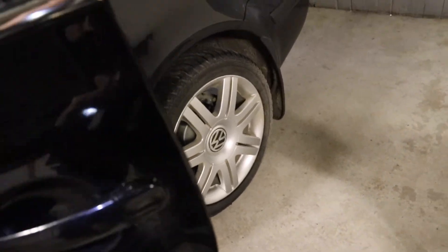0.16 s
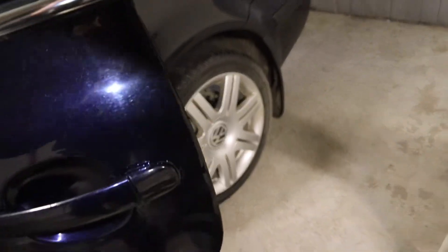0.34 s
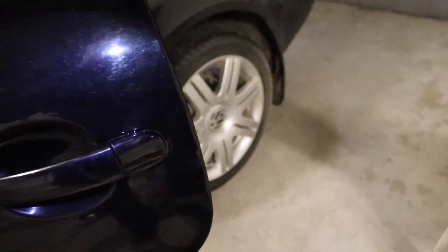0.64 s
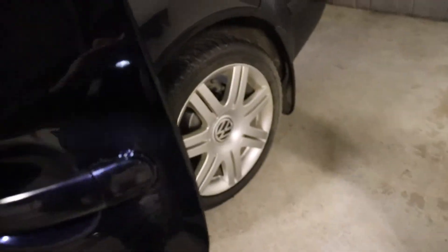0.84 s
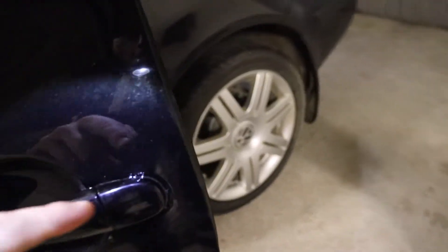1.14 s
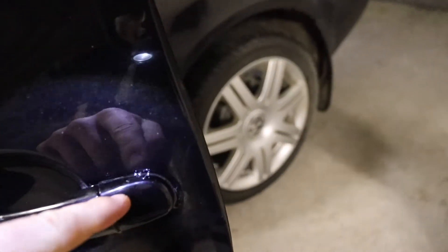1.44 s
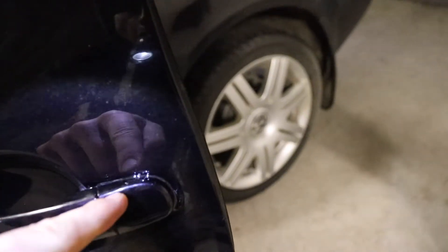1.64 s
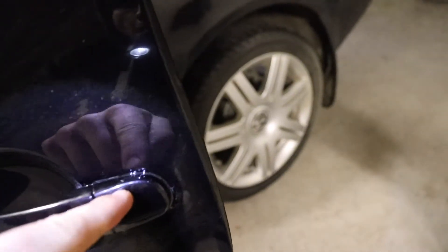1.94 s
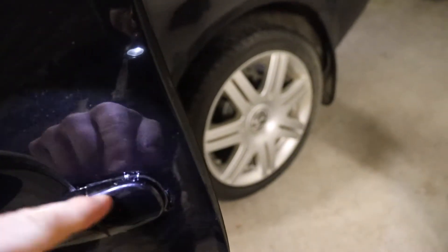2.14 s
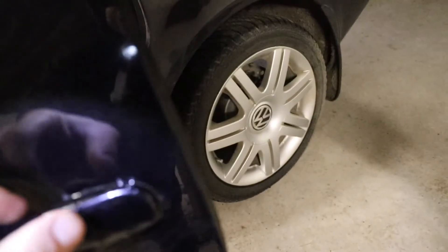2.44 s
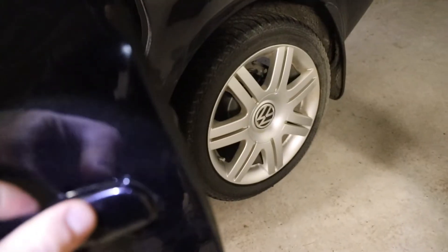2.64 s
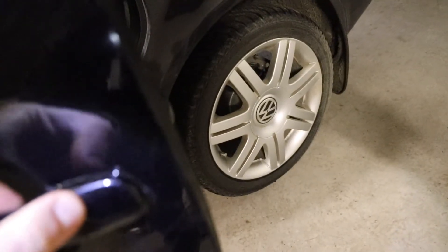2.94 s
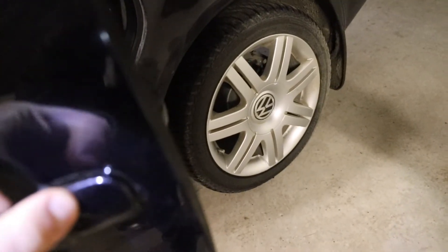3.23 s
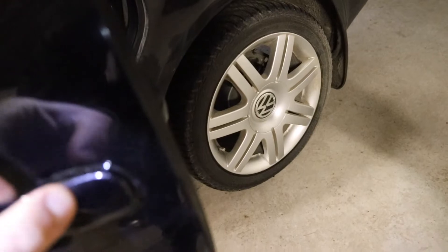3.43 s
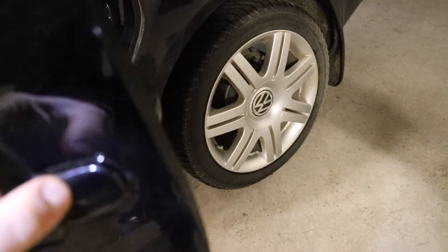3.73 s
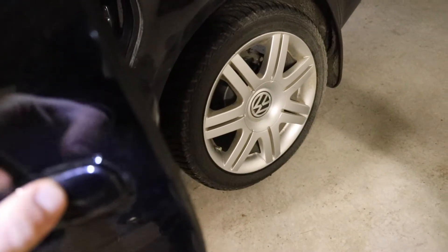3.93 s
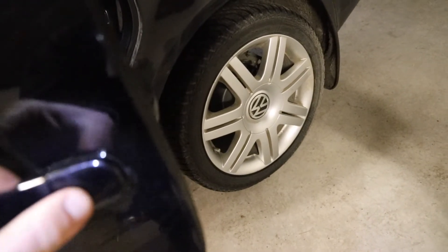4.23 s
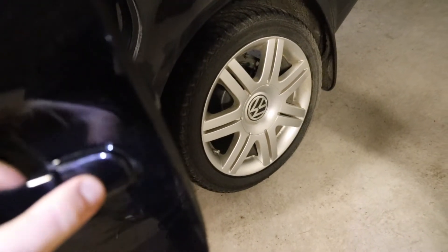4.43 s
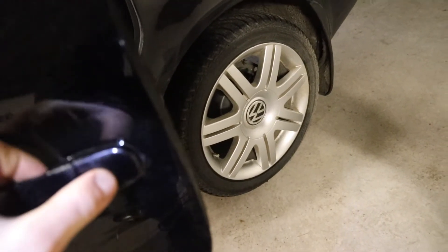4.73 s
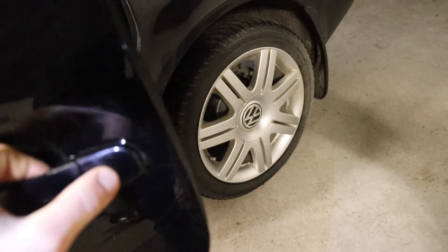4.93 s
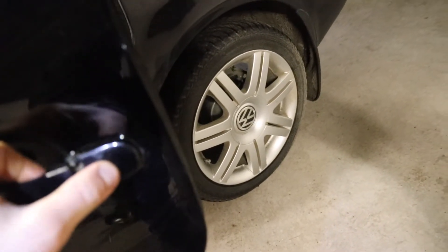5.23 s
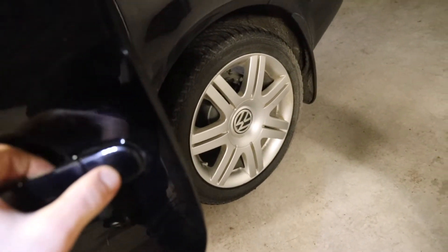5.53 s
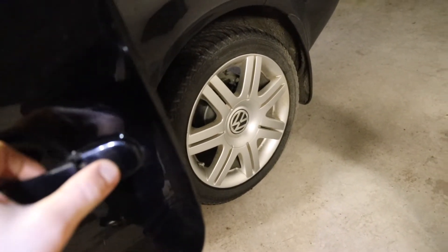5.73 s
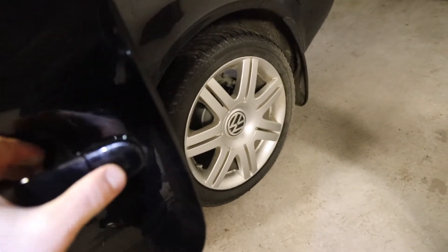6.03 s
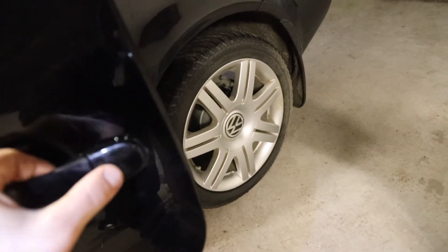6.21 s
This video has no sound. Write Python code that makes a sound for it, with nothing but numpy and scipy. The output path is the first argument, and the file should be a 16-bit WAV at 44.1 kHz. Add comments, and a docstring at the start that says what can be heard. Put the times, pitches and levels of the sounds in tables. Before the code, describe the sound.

Shoes scuff and step softly in a concrete garage, with a few small ticks and metal tinks. Then a car door's outside handle clicks and is pulled and let go five times, mostly harder each time. Rods scrape inside, the handle bangs on its stop, the door's metal skin booms and a spring jingles briefly. The microphone is close, with a short echo, low rumble and faint hiss.

```python
"""Shoes scuff and land in a concrete garage while small things tick, over a low rumble and a faint hiss.
Then a car door's outside handle is fingered, pulled and let go five times, mostly harder each time.
The rods inside scrape, the handle bangs on its stop, the door's metal skin booms and a spring jingles.
The hiss comes from a close camera, which turns itself down on loud bangs and rounds off their tips."""
import sys
import numpy as np
from scipy import signal
from scipy.fft import rfft, irfft, next_fast_len
from scipy.io import wavfile
from scipy.ndimage import uniform_filter1d, map_coordinates

SR = 44100
rng = np.random.default_rng(int(sys.argv[2]) if len(sys.argv) > 2 else 0)


def int16_out(signal):
    """Quantize to a 16-bit WAV file."""
    q = np.round(np.clip(np.atleast_2d(signal).T, -1, 1) * 32767)
    wavfile.write(sys.argv[1], SR, q.astype(np.int16))


N = 280916


def amp(db):
    return 10 ** (np.asarray(db) / 20)


def unit(x):
    """Scale a sound to an average (rms) strength of 1."""
    return x / np.sqrt(np.mean(x ** 2) + 1e-20)


def along(points, hz):
    """Read between (pitch_hz, value) points on a log pitch scale."""
    pitches, values = np.transpose(points)
    return np.interp(np.log(hz + 1), np.log(pitches + 1), values)


def filtered(x, response):
    """Scale and delay each frequency by response(hz)."""
    size = next_fast_len(len(x) + SR // 2)
    return irfft(rfft(x, size) * response(np.fft.rfftfreq(size, 1 / SR)), size)[:len(x)]


def resonances(modes):
    """A filter with one peak for each (pitch_hz, width_hz, level_db)."""
    return lambda hz: sum((-1) ** k * amp(db) * 1j * hz * width / (pitch**2 - hz**2 + 1j * hz * width)
                          for k, (pitch, width, db) in enumerate(modes))


def noise(spectrum, size=N):
    """Noise of strength 1, shaped by (pitch_hz, level_db) points."""
    return unit(filtered(rng.standard_normal(size), lambda hz: amp(along(spectrum, hz))))


def wobble(rate, size=N):
    """A smooth curve through `rate` random points a second."""
    points = rng.standard_normal(int(size * rate / SR) + 4)
    return map_coordinates(points, [np.arange(size) * rate / SR])


def ring(hz, fade_s, attack_s, t):
    """A tone that dies away by 60 dB in fade_s."""
    return np.sin(2 * np.pi * hz * t) * amp(-60 * t / fade_s) * (1 - np.exp(-t / attack_s))


def swells(rows, rise_db_s, fall_db_s):
    """Loudness of (start_s, hold_s, level_db) strokes: rise until start_s, hold, then fall."""
    t = np.arange(N) / SR
    return sum(amp(db - rise_db_s * np.maximum(s - t, 0) - fall_db_s * np.maximum(t - s - hold, 0))
               for s, hold, db in rows)


def add(track, start_s, sound):
    part = track[round(start_s * SR):][:len(sound)]
    part += sound[:len(part)]


def ticks(rows, tonal, spread):
    """Each tick is a short ring over a burst of noise from the uneven contact."""
    out, t = np.zeros(N), np.arange(SR // 10) / SR
    for s, db, hz, fade_s in rows:
        contact = rng.standard_normal(len(t)) * amp(-60 * t / fade_s)
        burst = filtered(contact, lambda f: resonances([(hz, spread * hz, 0)])(f) ** 2)
        add(out, s, amp(db) * (tonal * ring(hz, fade_s, .0001, t) + .79 * burst / abs(burst).max()))
    return out


def camera_hiss():
    """The camera adds a faint, steady hiss."""
    hiss_shape = [(1180, -7), (2000, 5.5), (2830, 7), (10900, 3), (16000, 2)]  # hiss: pitch_hz, level_db
    return amp(-58) * noise(hiss_shape)


def building():
    """A low rumble and the murmur of the building drift slowly."""
    rumble_levels = [(0, -46), (.8, -43), (1.4, -44), (1.6, -49), (2.5, -49), (2.7, -47), (3.1, -50),
                     (6.37, -52)]  # rumble over time: time_s, level_db
    rumble_shape = [(15, -45), (24, -4.5), (35, 5), (46, -9.5), (60, -18), (90, -34), (150, -87)]  # rumble: pitch_hz, level_db
    murmur_shape = [(41, -41), (70, -1), (191, -1), (288, -1.5), (337, -3.5), (427, -9), (1130, -14),
                    (1960, -25.5), (3000, -37.5), (3900, -72), (6600, -120)]  # murmur: pitch_hz, level_db
    rumble_db = np.interp(np.arange(N) / SR, *np.transpose(rumble_levels)) + 1.5 * wobble(5)
    return amp(rumble_db) * noise(rumble_shape) + amp(-47.5 + wobble(3.58)) * noise(murmur_shape)


def garage_echo(x):
    """The walls answer after 8 ms, and low notes last longest."""
    echo_fades = [(100, 1), (500, 0.94), (1500, 0.77), (3000, 0.78), (6500, 0.5), (12000, 0.48)]  # echo length: pitch_hz, fade_s
    out, size = np.zeros(N), SR // 4
    for start in range(0, N, size):  # a fresh echo for each quarter second
        hz, t, bands = signal.stft(rng.standard_normal(SR), SR, nperseg=256)
        fade = amp(-60 * t / along(echo_fades, hz)[:, None]) * (1 - np.exp(-t / .0022))
        tail = signal.istft(bands * fade, SR, nperseg=256)[1]
        add(out, start / SR + .008, signal.fftconvolve(x[start:start + size], tail / np.linalg.norm(tail)))
    return out


def small_things():
    """Dry ticks with a bright and a dull part, and a few tinks of small metal."""
    tick_times = [(0.038, -50, -33), (.151, -32.5, -48), (.252, -55, -31), (.271, -26.5, -55),
                  (.397, -34, -55), (0.569, -36, -33.5), (0.967, -37, -25.5), (1.075, -62, -39),
                  (2.219, -39, -46), (2.556, -50, -33), (2.619, -29, -32), (2.640, -39, -55),
                  (2.693, -31.5, -35.5), (2.816, -30, -30)]  # dry ticks: start_s, bright_db, dull_db
    tick_tones = [(10100, 0.0037), (2310, 0.004)]  # bright and dull part: pitch_hz, fade_s
    tink_times = [(.771, -32.5), (.950, -21), (1.052, -40), (1.515, -49)]  # metal tinks: start_s, level_db
    tink_tones = [(7720, -0.5, 0.019), (11700, -6, 0.0055)]  # the metal's notes: pitch_hz, level_db, fade_s
    taps = [(s, db, *tone) for s, *levels in tick_times for db, tone in zip(levels, tick_tones)]
    metal = [(s, level + db, hz, fade_s) for s, level in tink_times for hz, db, fade_s in tink_tones]
    return ticks(taps, tonal=.66, spread=1.0) + ticks(metal, tonal=1.46, spread=.36)


def feet():
    """Soles hiss over the concrete, then land with a click, a hollow knock and a thud."""
    scuffs = [(0, 0.017, -48.5), (.27, 0.061, -47.5), (.42, .14, -58.5), (.73, 0.077, -52),
              (1.02, 0.076, -50), (1.17, 0.094, -55.5), (2.27, 0.067, -60.5), (2.41, 0.082, -50),
              (2.56, .3, -58)]  # soles sliding: start_s, hold_s, level_db
    scuff_shape = [(350, -15), (800, 2.5), (1300, -9.5), (2000, -3.5), (2700, -10), (3500, -7.5),
                   (4600, -15), (6500, -11.5), (12000, -21.5), (16000, -28)]  # sole on concrete: pitch_hz, level_db
    steps = [(.351, -33, -21, -33.5), (.786, -29, -21.5, -27.5), (1.118, -30.5, -22.5, -32),
             (1.248, -30, -24.5, -33.5), (2.490, -30, -23.5, -26)]  # soles landing: start_s, click_db, knock_db, thud_db
    sole_tones = [(243, 0.11), (42.2, 0.47)]  # knock and thud: pitch_hz, fade_s
    slide = amp(2.5 * wobble(120)) * swells(scuffs, rise_db_s=98, fall_db_s=204)
    knock_hz = sole_tones[0][0]
    hollow = unit(filtered(rng.standard_normal(N), resonances([(knock_hz, 40, 0)])))
    tread = unit(filtered(rng.standard_normal(N), resonances([(3440, 350, 0)])))
    out = slide * (noise(scuff_shape) + amp(2) * hollow + amp(-20) * tread)
    t = np.arange(SR) / SR
    for s, click_db, *low_db in steps:
        thump = sum(amp(db) * ring(hz, fade_s, .00018, t) for db, (hz, fade_s) in zip(low_db, sole_tones))
        click = ring(3020, .013, .000057, t) + amp(-2 - 60 * t / .033) * noise(scuff_shape, SR)
        add(out, s, thump + amp(click_db) * click)
    return out


def handle_clicks():
    """The loose handle clicks as it takes up its slack."""
    clicks = [(2.545, -30, 5200, .012), (2.836, -30, 3400, 0.041), (2.839, -32, 5500, .04),
              (2.9, -23.5, 1320, 0.03), (2.958, -15.5, 2050, 0.063), (2.958, -32, 3600, 0.015),
              (3.179, -36, 7500, 0.0033), (4.542, -41, 5700, 0.033), (5.318, -34, 2470, .04)]  # handle clicks: start_s, level_db, pitch_hz, fade_s
    return ticks(clicks, tonal=.17, spread=.53)


def rod_scrapes():
    """The handle's rods stick and slip: many tiny jerks make them ring and give off a gritty treble."""
    rod_tones = [(398, 138, 8.5), (845, 410, 1), (1347, 81, -2.5), (2054, 440, -3.5)]  # the rods' notes: pitch_hz, width_hz, level_db
    rasp_tone = [(1516, 570, 0)]  # the rod that rasps loudest: pitch_hz, width_hz, level_db
    grit_shape = [(2000, -1), (3000, 3.5), (6000, -0.5), (10000, -4), (13000, -13), (16000, -30)]  # gritty treble: pitch_hz, level_db
    pulls = [(3.14, 0.022, -45.5), (3.62, 0.055, -46.5), (4.455, 0.074, -38.5), (5.03, .11, -40),
             (5.725, 0.042, -34.5), (6.25, .12, -40)]  # handle drawn out slowly: start_s, hold_s, level_db
    snags = [(3.12, -55, 2), (3.306, -55, 8), (3.357, -49, -9), (3.573, -39, -4.5), (3.604, -46, 2),
             (3.703, -40, -7), (3.825, -42.5, 3), (4.398, -43.5, -12), (4.425, -49, -4), (4.694, -49, -21),
             (4.722, -35, -23), (4.996, -39, -4), (5.317, -36.5, -7)]  # rods catch for a moment: peak_s, level_db, rasp_db
    returns = [(3.385, -31.5, 304, -15.5), (3.876, -27, 598, -15), (4.745, -21, 431, -16.5),
               (5.377, -24.5, 902, -13.5), (5.95, -22.5, 900, -15)]  # handle slides home, at differing speeds: peak_s, level_db, rise_db_s, grit_db
    slips = unit(rng.standard_normal(N) * amp(2.5 * wobble(150)))
    body = unit(filtered(slips, lambda hz: resonances(rod_tones)(hz) / (1 + 1j * hz / 2500) ** 2))
    grit = unit(filtered(slips, lambda hz: amp(along(grit_shape, hz))))
    rasp = unit(filtered(slips, lambda hz: resonances(rasp_tone)(hz) ** 2))

    def scrape(grit_db, rasp_db):
        return body + amp(grit_db) * grit + amp(rasp_db) * rasp

    out = swells(pulls, rise_db_s=200, fall_db_s=215) * scrape(grit_db=-19, rasp_db=-8)
    for s, db, rasp_db in snags:
        out += swells([(s, 0, db)], rise_db_s=3500, fall_db_s=513) * scrape(grit_db=-21, rasp_db=rasp_db)
    for s, db, rise_db_s, grit_db in returns:
        out += swells([(s, 0, db)], rise_db_s, fall_db_s=1200) * scrape(grit_db, rasp_db=-5)
    return out


def spring_jingles():
    """The return spring slaps its seat with a short ring of steel."""
    slaps = [(2.9, -23.5), (3.889, -39), (4.75, -23.5), (5.399, -7.5), (5.974, -11.5)]  # spring slaps: start_s, level_db
    spring_tones = [(5636, -15), (6385, -4), (7074, -6), (7720, -19), (8100, -7.5), (8861, -9),
                    (10200, -31)]  # the spring's notes: pitch_hz, level_db
    out, t = np.zeros(N), np.arange(SR // 10) / SR
    for s, level_db in slaps:
        chatter = 1 + 1.8 * uniform_filter1d(rng.standard_normal(len(t)), size=20)
        steel = sum(amp(db + rng.normal(0, 2)) * ring(hz, .02, .0004, t) for hz, db in spring_tones)
        add(out, s, amp(level_db - 3) * steel * chatter)
    return out


def handle_bangs():
    """The handle hits its stop with a crack, rattles the inner panel and rings the door's skin."""
    bangs = [(2.9569, -36, -42.5, -30, -22.5), (3.3913, -57, -36.5, -29.5, -26.5),
             (3.8804, -29, -28.5, -16.5, -15.5), (3.8925, -27, -29, -31.5, -16),
             (4.7406, -34, -44, -20.5, -25), (4.7519, -24.5, -27, -18.5, -11.5),
             (4.9916, -68, -52, -34, -33), (5.3842, -2.5, -17, -2, 6.5), (5.7058, -48, -46, -32.5, -23),
             (5.9591, -9, -20.5, -6.5, 1.5), (6.2842, -54, -64, -31, -40)]  # hits on the stop: start_s, crack_db, boom_db, ring_db, clatter_db
    skin_tones = [(103.3, 10, 0.29), (137.4, 2, 0.83), (192.1, 0, 0.22), (248.7, 0, 0.11),
                  (293.3, 1.5, 0.2), (319.5, -4, 0.28), (389.2, 10, 0.077), (419, -1, 0.13),
                  (462, -1.5, 0.17), (560, -11.5, 0.24)]  # door skin, the first two notes are the boom: pitch_hz, level_db, fade_s
    panel_tones = [(718, 175, 8), (950, 240, 6), (1166, 92, 3), (1366, 290, -5), (1820, 95, -5),
                   (2500, 150, -53)]  # inner panel and rods: pitch_hz, width_hz, level_db
    crack_shape = [(710, -77), (1200, 15.5), (2040, 8.5), (3870, -8), (4360, -7.5), (4910, -15),
                   (5470, -14.5), (7820, -8.5), (16000, -78)]  # sharp crack: pitch_hz, level_db
    out, t = np.zeros(N), np.arange(SR) / SR
    for s, crack_db, boom_db, ring_db, clatter_db in bangs:
        attack_s = np.interp(crack_db, [-30, -10], [.008, .002])  # a gentle blow is a longer push
        skin = np.zeros(SR)
        for k, (hz, db, fade_s) in enumerate(skin_tones):
            waver_db = 4 * wobble(25, SR)  # close neighbouring notes make each one waver
            skin += amp(db + (boom_db if k < 2 else ring_db) + waver_db) * ring(hz, fade_s, attack_s, t)
        shake = rng.standard_normal(SR) * (amp(-60 * t / .011) + .092 * amp(-60 * t / .32))
        clatter = filtered(shake, resonances(panel_tones))
        clatter /= abs(clatter).max()
        crack = noise(crack_shape, SR) * (amp(-60 * t / .026) + .076 * amp(-60 * t / .42))
        add(out, s, amp(.5) * skin + amp(clatter_db) * clatter + amp(crack_db + 2) * crack)
    # the door is too small to give off deep bass
    return filtered(out, lambda hz: (1j * hz / (70 + 1j * hz)) ** 2)


def scene():
    """The door, the quieter sounds, their echo and the background, in one channel."""
    door = handle_bangs() + spring_jingles() + rod_scrapes() + handle_clicks()
    quiet = feet() + small_things()
    echo = garage_echo(amp(-12) * door + amp(-28.5) * quiet)
    return (door + quiet + echo + building() + camera_hiss())[None]


def record(dry):
    """The camera turns down after loud peaks and recovers, rounds off the tips and cuts the top treble."""
    threshold_db, recover_s, top_hz = -8.5, .06, 16000
    excess = np.maximum(abs(dry[0]) / amp(threshold_db) - 1, 0)
    memory = np.exp(-1 / (recover_s * SR))
    recent_excess = signal.lfilter([1 - memory], [1, -memory], excess)
    lowered = dry[0] / (1 + 5 * recent_excess)
    rounded = lowered / (1 + abs(lowered) ** 8) ** (1 / 8)
    return .93 * filtered(rounded, lambda hz: hz < top_hz)[None]


dry = scene()
out = record(dry)
int16_out(out)
```